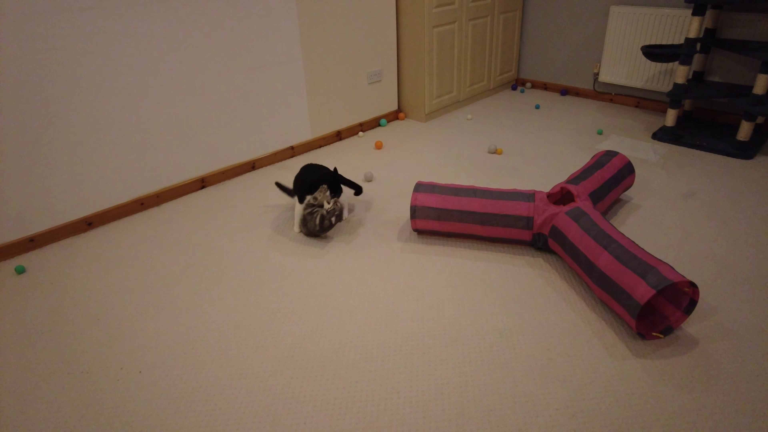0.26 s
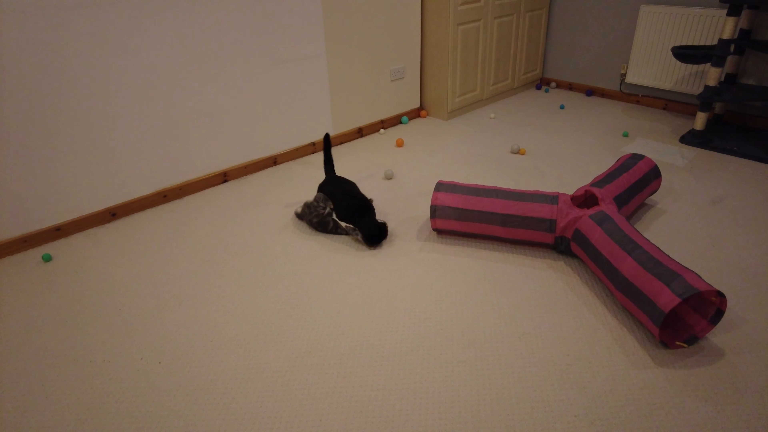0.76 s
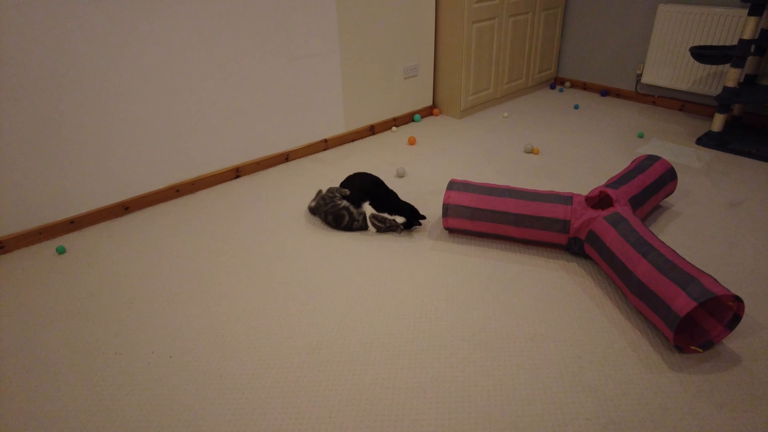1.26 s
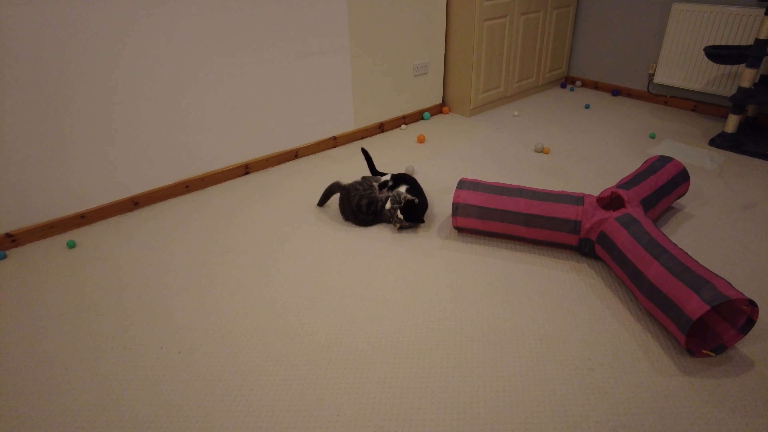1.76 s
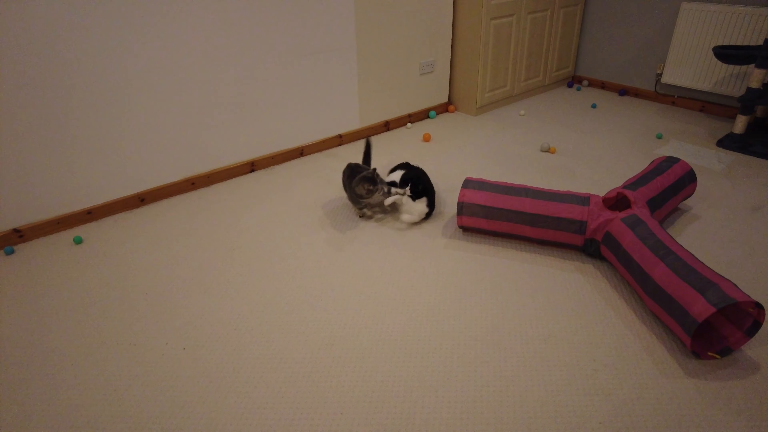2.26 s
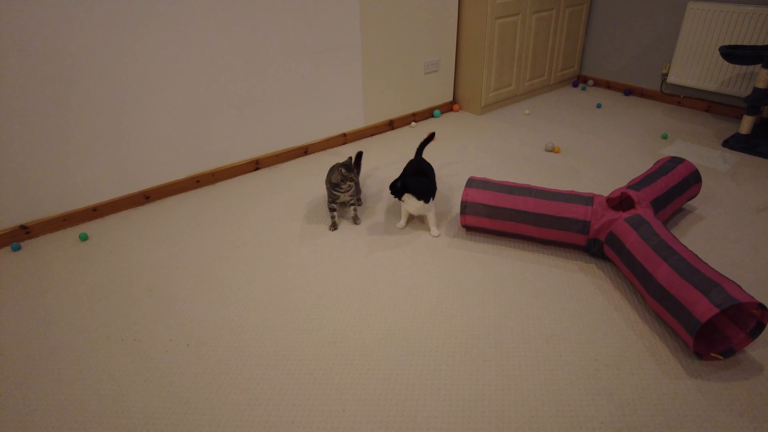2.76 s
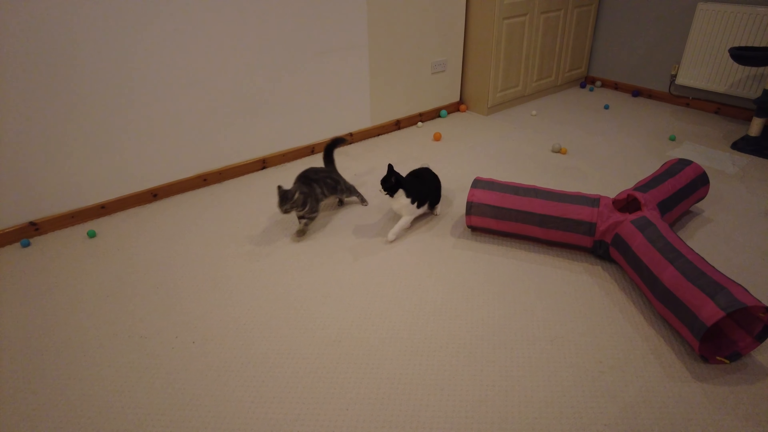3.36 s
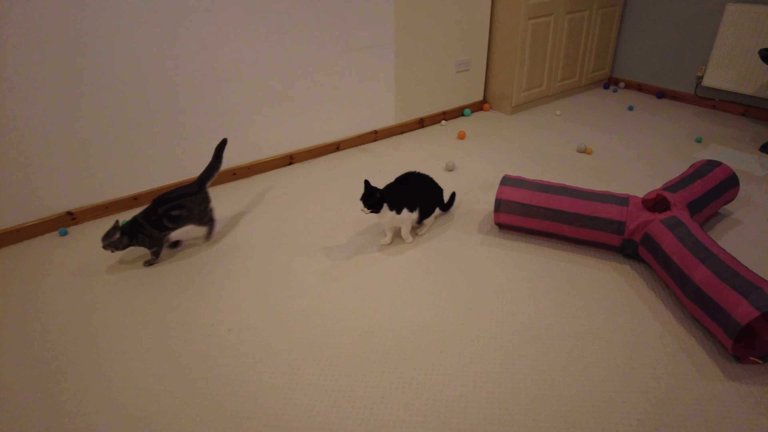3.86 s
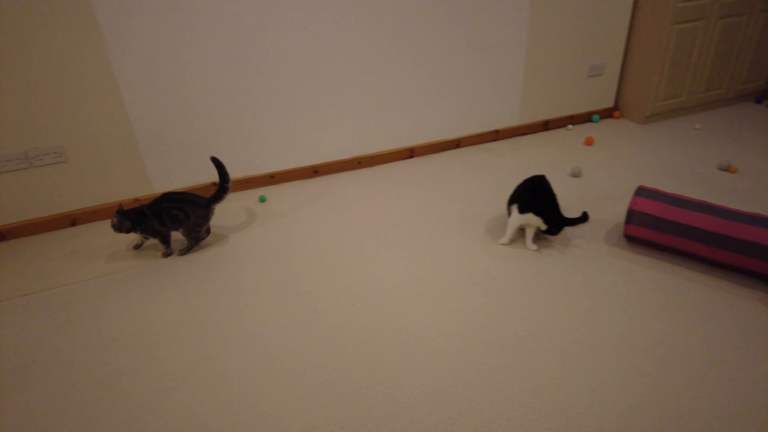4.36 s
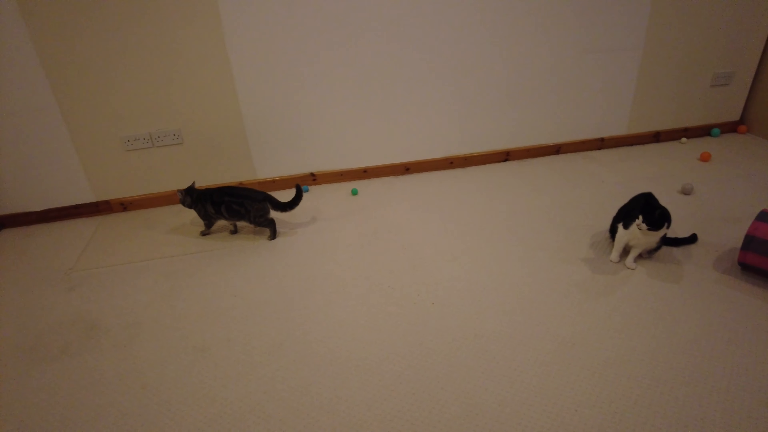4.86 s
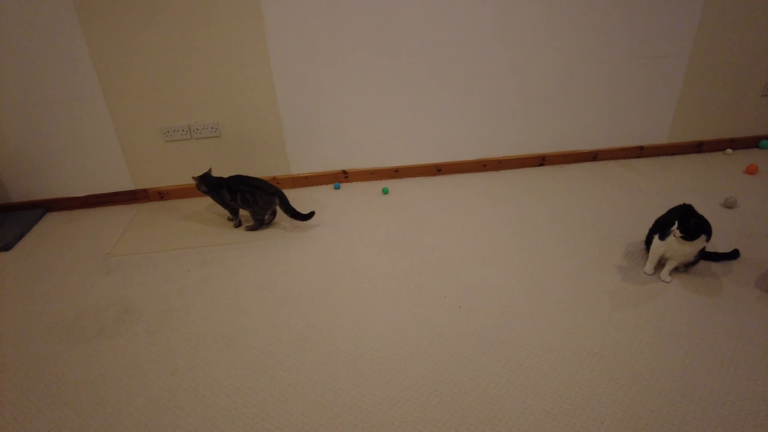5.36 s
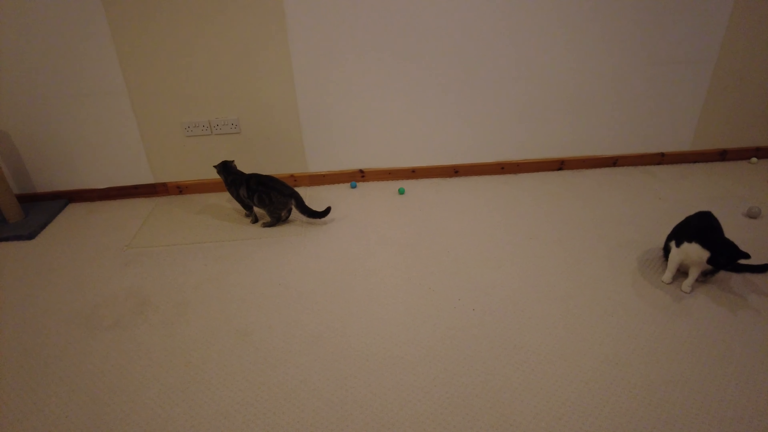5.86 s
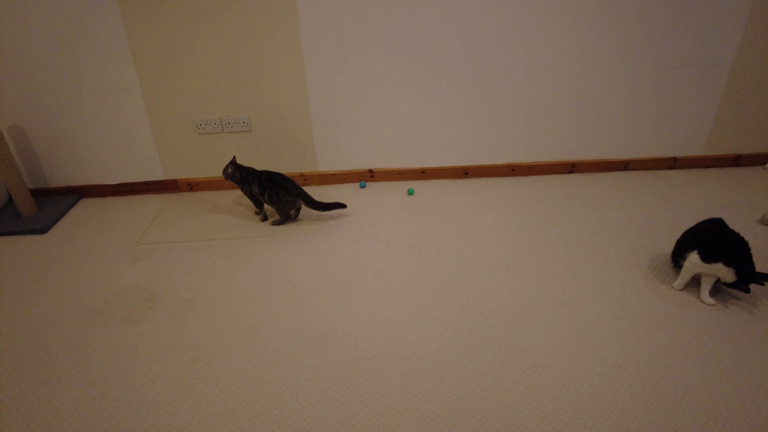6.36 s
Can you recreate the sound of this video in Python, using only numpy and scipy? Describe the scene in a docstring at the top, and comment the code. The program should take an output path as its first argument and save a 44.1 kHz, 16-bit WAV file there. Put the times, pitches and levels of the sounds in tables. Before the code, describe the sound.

Two cats wrestle on carpet laid over a springy wooden floor in a bare room. Rapid low padded thumps and brief scuffs come in clusters, with a crisp claw snap and knock midway and a heavy double landing as they part. Light paw steps follow, then a short airy spit and tiny high squeaks. The camera microphone, some distance away, adds soft hiss over low house rumble.

```python
"""A bare room with carpet on a sprung wooden floor: two cats wrestle, then part; one spits and squeaks.
Landings ring decaying low floor modes, paws are short padded tones, claws snap and knock the boards.
Shoves swell shaped noise for rolling, scrabbling and fur on the pile; the voice is puffs and wavering tones.
Noise tails answer as the room; filtered noise makes the floor sway, the house rumble, the faint whine
and the camera's hiss."""
import sys
import numpy as np
from scipy import signal
from scipy.fft import rfft, irfft, next_fast_len
from scipy.io import wavfile
from scipy.ndimage import uniform_filter1d, map_coordinates

SR = 44100
rng = np.random.default_rng(int(sys.argv[2]) if len(sys.argv) > 2 else 0)


def transcribe(signal):
    """Save signal, clipped to [-1, 1], as a 16-bit WAV file at the path in sys.argv[1]."""
    frames = np.atleast_2d(signal).T
    limited = np.clip(frames, -1, 1)
    pcm = np.round(limited * 32767).astype(np.int16)
    wavfile.write(sys.argv[1], SR, pcm)


N = 291324

# Heavy landings that shake the floor: (time [s], boom level [dB], joist sway level [dB])
LANDINGS = [(0.063, -27, -29), (0.179, -12.5, -50), (0.231, -19.5, -50), (0.279, -13.5, -32),
            (0.328, -19, -41), (0.421, -21.5, -46), (0.579, -11, -11.5), (0.652, -15.5, -49),
            (0.688, -14.5, -37), (0.767, -14, -33), (0.817, -12.5, -48), (0.928, -58, -23),
            (1.144, -27, -25), (1.597, -21.5, -45), (1.818, -31, -21), (2.048, -31, -50), (2.253, -26, -59),
            (2.426, -5.5, -36), (2.5, -11, -49), (2.548, -17, -17.5), (2.849, -22.5, -62),
            (3.054, -51, -18), (3.72, -36, -55), (4.067, -23, -53), (4.167, -59, -25)]
# Floor and room modes, the joists first: (frequency [Hz], relative level [dB], decay t60 [s])
FLOOR_MODES = [(21.37, -3, 0.53), (53.8, 1.5, 0.16), (74.2, -2, 0.11), (103.2, -17.5, 0.18)]

# Paws and flanks on the carpet, toes the highest: (time [s], level [dB], pad pitch [Hz])
THUDS = [(0.033, -34, 234), (0.161, -20, 205), (0.164, -39.5, 750), (0.18, -14, 188), (0.263, -28, 462),
         (0.268, -18, 282), (0.292, -15.5, 221), (0.326, -22.5, 177), (0.367, -35, 580),
         (0.383, -23.5, 200), (0.501, -36, 500), (0.505, -19, 291), (0.527, -20.5, 205),
         (0.556, -22.5, 184), (0.677, -36.5, 574), (0.694, -27, 163), (0.754, -20, 289), (0.7, -34, 614),
         (0.785, -24, 316), (0.795, -28, 645), (0.81, -26.5, 648), (0.81, -21.5, 189), (0.849, -33, 510),
         (0.967, -43, 750), (1.037, -43.5, 764), (1.094, -35, 337), (1.233, -37, 550), (1.285, -44, 1240),
         (1.442, -37, 715), (1.53, -33.5, 790), (1.564, -24.5, 210), (1.567, -17.5, 587), (1.57, -27, 1310),
         (1.572, -31, 1720), (1.605, -27, 736), (1.622, -33, 1270), (1.574, -20, 800), (1.587, -19, 215),
         (1.609, -31, 190), (1.592, -18.5, 740), (1.63, -22.5, 304), (1.63, -28, 650), (1.776, -18.5, 241),
         (1.782, -31, 683), (1.785, -35, 445), (1.808, -26, 155), (1.81, -34, 676), (1.83, -18.5, 173),
         (2.019, -25, 219), (2.049, -30, 230), (2.083, -37.5, 720), (2.345, -33, 584), (2.354, -25, 200),
         (2.397, -24.5, 537), (2.41, -32.5, 695), (2.422, -26, 540), (2.44, -28, 536), (2.436, -13, 225),
         (2.456, -32, 854), (2.485, -40, 790), (2.456, -19, 483), (2.46, -8.5, 304.5), (2.479, -22, 472),
         (2.484, -16, 300), (2.47, -32, 866), (2.486, -19, 390), (2.5, -22, 160), (2.518, -25, 220),
         (2.548, -20.5, 167), (3.348, -35, 164), (3.503, -29.5, 154.4), (3.628, -45.5, 624),
         (3.634, -35.5, 254), (3.78, -49.5, 846), (3.789, -29.5, 156), (3.889, -32.5, 303),
         (3.866, -34, 247), (3.866, -42.5, 580), (4.028, -32, 252), (4.085, -31, 488), (4.096, -35, 151),
         (4.148, -27.5, 146), (4.384, -44, 744), (4.469, -37.5, 210), (4.472, -48.5, 677)]
PAD_DECAY_S = 0.83 / 205  # the same for every pad, so higher pads ring more cycles
PAD_PAN_DB, CLAW_PAN_DB = 2.5, 2  # the cats are left of the camera
# Standing waves of the room: (frequency [Hz], width [Hz], level [dB])
STANDING_WAVES = [(155, 4.5, 3.5), (195.4, 6.7, 2.5), (265.6, 6.4, -10.5)]

# Claws catching the pile, with two early wall echoes of the strongest crack at 1.5742 and 1.5906 s:
# (time [s], crack peak [dB], knock peak [dB], treble tilt [dB at 4 kHz])
CLAWS = [(0.264, -51, -38, -10), (0.3673, -60, -30, 0), (0.7937, -33, -38, 2), (1.1006, -44, -52, -4),
         (1.2307, -39, -30, 5), (1.2393, -65, -34, 11), (1.4419, -33, -39, -6), (1.5073, -38, -36, 7),
         (1.568, -24, -10.5, 5), (1.5742, -40, -19, 7), (1.5756, -32, -31, -16), (1.5906, -41, -26, 9),
         (2.461, -38, -46, -12), (4.0315, -53, -41, -3), (4.0456, -48, -41, -12), (4.0986, -60, -36.5, -10)]
# Spectrum of a claw's crack: (frequency [Hz], level [dB])
SNAP_SPECTRUM = [(1200, -31), (2500, 14), (4000, 1), (5500, 3), (7200, -7.5), (9500, -6), (12500, -11),
                 (16000, -47)]
FRAY = 0.13  # strength of fibres tearing after the snap, against a snap of 1
# Boards under the carpet: (frequency [Hz], width [Hz], level [dB])
BOARDS = [(463, 860, -1.5), (1280, 2900, -8.5)]

# Shoves and slides over the carpet, levels at their strongest moment:
# (time [s], swell time [s], body weight [dB], pile dragged [dB], fur rubbed [dB])
SHOVES = [(0.06, 0.21, -49, -58, -57), (0.165, 0.012, -43.5, -60, -64), (0.277, 0.044, -32, -57, -63),
          (0.325, 0.15, -42, -70, -53.5), (0.37, 0.012, -46, -51, -69), (0.516, 0.03, -36, -70, -65),
          (0.56, 0.064, -70, -55.5, -59), (0.691, 0.058, -42, -58, -56.5), (0.8, 0.019, -38, -44.5, -44),
          (0.84, .03, -59, -54.5, -71), (1.1, 0.18, -61, -63, -64), (1.24, 0.03, -48, -47, -59),
          (1.45, 0.035, -52.5, -57, -52.5), (1.53, 0.12, -51, -52, -60), (1.6, 0.12, -34, -44.5, -52.5),
          (1.788, 0.11, -35.5, -50.5, -57.5), (1.89, 0.063, -44, -62, -57.5),
          (2.031, 0.067, -48.5, -58, -56.5), (2.112, 0.12, -48, -52.5, -55),
          (2.26, 0.13, -47.5, -65, -53.5), (2.349, 0.055, -46.5, -46.5, -56), (2.41, 0.058, -39, -62, -60),
          (2.472, 0.073, -27.5, -48.5, -49.5), (3.52, 0.07, -49, -69, -59), (3.6, 0.099, -54, -78, -65),
          (3.77, 0.46, -51.5, -72, -65), (3.892, 0.15, -49.5, -71, -61), (4.039, 0.02, -39, -68, -58),
          (4.108, 0.047, -37, -53.5, -57.5), (4.36, 0.081, -60, -55, -59.5), (4.47, 0.044, -50.5, -68, -60),
          (4.55, 0.12, -58.5, -88, -80), (6.58, 0.05, -76, -61, -73)]
SWELL_DB = 18  # rise over the swell time
# Fade after each shove: one rate each for rolling, scrabbling, pile, fur [dB/s]
FALL_RATES = [142, 124, 131, 107]
SCRABBLE_SHARE, SCRABBLE_DB = 0.54, 1  # weight's share against drag in the scrabbling level, and its lift
# Bodies rolling on the carpet, spectrum: (frequency [Hz], level [dB])
ROLL_SPECTRUM = [(90, -52), (155, 16.5), (200, 11), (290, 7), (420, 7), (700, -44)]
# Paws scrabbling, spectrum: (frequency [Hz], level [dB])
SCRABBLE_SPECTRUM = [(300, -9), (480, 15), (600, 11.5), (800, 7.5), (1000, -1), (1500, -48)]
# Carpet pile dragged, spectrum: (frequency [Hz], level [dB])
PILE_SPECTRUM = [(700, -10), (1200, 6.5), (1800, -1.5), (2500, -12), (4000, -19), (7000, -41)]
# Fur scrubbing the carpet, spectrum: (frequency [Hz], level [dB])
FUR_SPECTRUM = [(1800, 7.5), (3000, 3.5), (5000, -2.5), (8000, -9), (12000, -13.5), (13500, -23),
                (15000, -31), (15700, -49)]
# Extra brightness of hard-rubbed fur, spectrum: (frequency [Hz], level [dB])
SHEEN_SPECTRUM = [(9000, -40), (11000, -11), (15000, -3), (15700, -2)]
SHEEN_DB, SHEEN_POWER = 31, 1.92  # gain, and how much faster than the fur it grows

# The spit, a single row: (time [s], length [s], level [dB])
SPIT = (4.108, 0.023, -38.5)
TRAIL_DB, TRAIL_T60 = -9.5, 0.5  # air still leaking after the spit: level against the spit, decay [s]
# The open mouth of the spit: (frequency [Hz], width [Hz], level [dB])
OPEN_MOUTH = [(2400, 330, -3), (3080, 470, 0), (3900, 440, -3.5), (4770, 350, 5), (6000, 960, -10)]
# The mouth as it relaxes: (frequency [Hz], width [Hz], level [dB])
RELAXED_MOUTH = [(2570, 490, -5), (3520, 810, 1), (4700, 700, 1), (5900, 870, -9)]
# A faint hoarse tone, a single row:
# (time [s], length [s], start [Hz], end [Hz], level [dB], octave above against it [dB])
MEW = (3.565, .12, 1450, 1360, -59, -5)
# Squeaks, the first a mere tick: (time [s], length [s], pitch [Hz], level [dB])
SQUEAKS = [(3.7075, 0.0027, 2100, -48), (4.337, 0.026, 1905, -46), (4.362, 0.012, 2050, -57),
           (4.383, 0.017, 1840, -52)]
HOARSE_HZ, SQUEAK_WANDER_HZ = 170, 75  # depth of the random pitch wander of mew and squeaks

# Sway of the floor in its two lowest modes: (time [s], joist level [dB], boom level [dB])
SWAY = [(0.0, -36.5, -45.5), (0.5, -43, -40.5), (0.75, -23.5, -33.5), (1.18, -43, -46.5),
        (1.78, -35, -40.5), (2.04, -36.5, -46), (2.3, -33, -43), (2.5, -35.5, -24.5), (2.76, -36.5, -43.5),
        (3.13, -39, -45.5), (3.26, -42.5, -46.5), (3.72, -37.5, -40), (3.95, -43, -44.5),
        (4.27, -33.5, -46.5), (4.82, -46.5, -49), (5.32, -52.5, -43.5), (5.8, -47, -50), (6.61, -51, -49)]
# Faint wavering bands in the room tone, applied twice over: (frequency [Hz], width [Hz], level [dB])
WHINE_BANDS = [(1295, 70, -1), (1755, 160, 0), (2314, 43, 0), (2780, 290, -4)]
# Rumble and tone of the house, spectrum: (frequency [Hz], level [dB])
HOUSE_SPECTRUM = [(50, -53), (85, -5), (200, -6), (281, -11), (322, -7), (391, -17), (438, -14),
                  (1000, -30.5), (1300, -58), (2200, -120)]
# Hiss of the camera, spectrum: (frequency [Hz], level [dB])
HISS_SPECTRUM = [(300, -10), (1000, -2), (1750, -1.5), (2100, -2), (2800, -2.5), (5000, -5), (8000, -9.5),
                 (12500, -17), (13000, -33)]
WHINE_DB, HOUSE_DB, HISS_DB = -71.5, -55, -64.5
PATCHY_DB = 2.5  # depth of the swelling and fading of random bands

# How alike left and right noise are: (frequency [Hz], likeness [-1 to 1])
LIKENESS = [(30, 0.97), (60, 0.93), (130, 0.99), (290, 0.7), (640, -0.077), (1400, -0.022), (3100, 0.41),
            (6800, 0.46), (15000, 0.11)]
# Decay of the room: (frequency [Hz], t60 [s])
ROOM_DECAY = [(150, 0.55), (400, 0.47), (800, 0.29), (2000, 0.38), (5000, 0.21), (12000, 0.31)]
# The camera body colours sound from the room: (frequency [Hz], width [Hz], boost [dB])
CAMERA_BODY = [(1040, 280, -2), (2200, 690, -1.5), (2900, 650, 1.5), (3600, 550, -3), (4270, 520, 2),
               (6320, 600, 4), (6930, 900, -3.5), (9000, 810, .5)]
TOP_HZ = 15750  # band limit of the camera


def amp(db):
    """Decibels to amplitude."""
    return 10 ** (np.asarray(db) / 20)


def unit(x):
    """Scale to an rms of 1."""
    return x / np.sqrt(np.mean(x ** 2) + 1e-20)


def along(points, hz):
    """Read (frequency, value) points on a log frequency axis."""
    f, v = np.transpose(points)
    return np.interp(np.log(hz + 1), np.log(f + 1), v)


def curves(rows):
    """One gain per sample for each dB column after the time."""
    s, *columns = np.transpose(rows)
    return [amp(np.interp(np.arange(N) / SR, s, column)) for column in columns]


def filtered(x, response):
    """Shape x by a complex response of frequency."""
    m = next_fast_len(x.shape[-1] + 8192)
    return irfft(rfft(x, m) * response(np.fft.rfftfreq(m, 1 / SR)), m)[..., :x.shape[-1]]


def modes(table):
    """Causal response of (frequency, width, level) resonances, summed with alternating sign."""
    def response(f):
        total = 0
        for k, (centre, width, db) in enumerate(table):
            damping = 1j * f * width
            total = total + (-1) ** k * amp(db) * damping / (centre * centre - f * f + damping)
        return total
    return response


def pair(n):
    """Two white noises, as alike as a diffuse field is at the two ports."""
    def mid_side_gains(hz):
        turn = np.arccos(np.clip(along(LIKENESS, hz), -1, 1)) / 2
        return np.array([np.cos(turn), np.sin(turn)])
    mid, side = filtered(rng.standard_normal((2, n)), mid_side_gains)
    return np.array([mid + side, mid - side])


def wander(t, rate):
    """Smooth random drift with rate new values a second."""
    return map_coordinates(rng.standard_normal(int(t[-1] * rate) + 4), [t * rate])


def rush(spectrum, lumpy_db, rate):
    """Stereo noise of rms 1 in lumps, rate a second."""
    lumps = wander(np.arange(N) / SR, rate)
    noise = filtered(pair(N), lambda hz: amp(along(spectrum, hz)))
    return unit(amp(lumpy_db * lumps) * noise)


def patchy(x):
    """Random bands of a noise swell and fade; the result has rms 1."""
    z = signal.stft(x, nperseg=512)[2]
    field = uniform_filter1d(rng.standard_normal(z.shape[1:]), size=7, axis=0)  # smooth over frequency
    field = uniform_filter1d(field, size=8, axis=1)  # and over time
    return unit(signal.istft(z * amp(PATCHY_DB * unit(field)), nperseg=512)[1][:, :N])


def add(out, s, sound, pan_db, wet_db, count=0, dull_db=0):
    """Place a sound and its own room tail, each frequency dying at its own speed.

    The right port hears the direct sound count samples later.
    Carpet and curtains take treble off the tail, dull_db at 4 kHz and more above."""
    hz, t, z = signal.stft(pair(SR // 4), SR, nperseg=256)
    decay_db = -60 * t / along(ROOM_DECAY, hz)[:, None]
    treble_db = dull_db * np.log2(hz / 4000 + 1)[:, None]
    tail = signal.istft(z * amp(decay_db - treble_db), SR, nperseg=256)[1]
    delayed = np.pad(sound, (140, 0))[None]  # the room answers a little late
    wet = signal.fftconvolve(delayed, tail / np.linalg.norm(tail[0]), axes=1)
    at = round(s * SR)
    out[0, at:at + len(sound)] += sound * amp(pan_db / 2)
    out[1, at + count:at + count + len(sound)] += sound * amp(-pan_db / 2)
    out[:, at:at + wet.shape[1]] += amp(wet_db) * wet * amp([[pan_db / 4], [-pan_db / 4]])


def landings():
    """A soft blow rings the low floor modes, slightly stronger at the right port."""
    out, t = np.zeros(N + SR), np.arange(SR) / SR
    soft_onset = 1 - np.exp(-t / 0.016)
    for s, boom_db, sway_db in LANDINGS:
        for k, (hz, db, t60) in enumerate(FLOOR_MODES):
            blow_db = boom_db if k else sway_db  # the first mode is the joists
            level = amp(blow_db + db - 60 * t / t60)
            out[round(s * SR):][:SR] += level * np.sin(2 * np.pi * hz * t) * soft_onset
    return out[:N] * amp([[-.7], [.7]])


def thuds():
    """A padded contact gives a brief tone at its own pitch; the rest is the room and its standing waves."""
    out, t = np.zeros((2, N + SR)), np.arange(SR // 10) / SR
    u = t / PAD_DECAY_S
    for s, db, hz in THUDS:
        pad = amp(db) * u * np.exp(-u) * np.sin(2 * np.pi * hz * t)
        add(out, s, pad, PAD_PAN_DB, wet_db=-2.5)
    return out[:, :N] + filtered(out[:, :N].mean(axis=0), modes(STANDING_WAVES))


def claws():
    """A thread lets go with a crack and the paw knocks the boards; two rows are early wall echoes."""
    out, t = np.zeros((2, N + SR)), np.arange(SR // 20) / SR
    snap = np.arange(len(t)) == round(SR / 5000)  # a single click
    knock = filtered(t * np.exp(-t / .0001), modes(BOARDS))  # the pad softens the blow
    knock = knock / abs(knock).max()
    for s, db, knock_db, tilt_db in CLAWS:
        burst = FRAY * amp(-60 * t / 0.006) * rng.standard_normal(len(t)) - snap
        crack = filtered(burst, lambda hz: amp(along(SNAP_SPECTRUM, hz) + tilt_db * np.log2(hz / 4000 + 1)))
        snag = amp(db) * crack / abs(crack).max() - amp(knock_db) * knock
        add(out, s, snag, CLAW_PAN_DB, wet_db=-1.5, dull_db=3.0)
    return out[:, :N]


def scuffle():
    """Each shove swells and fades; rolling, scrabbling, pile and fur are noise, mostly lumpier when lower."""
    power, t = np.zeros((4, 6700)), np.arange(6700) / 1000  # envelopes in 1 ms steps
    fall = -np.array(FALL_RATES)[:, None]
    for s, swell, weight_db, drag_db, fur_db in SHOVES:
        paws_db = SCRABBLE_SHARE * weight_db + (1 - SCRABBLE_SHARE) * drag_db + SCRABBLE_DB
        peak_db = np.array([[weight_db], [paws_db], [drag_db], [fur_db]])
        slope = np.where(t < s, SWELL_DB / swell, fall)
        power += amp(peak_db + slope * (t - s)) ** 2
    roll, scrabble, pile, fur = (np.interp(np.arange(N) / SR, t, g) for g in np.sqrt(power))
    out = roll * rush(ROLL_SPECTRUM, lumpy_db=2.5, rate=37)
    out += scrabble * rush(SCRABBLE_SPECTRUM, lumpy_db=3.0, rate=27)
    out += pile * patchy(rush(PILE_SPECTRUM, lumpy_db=1.0, rate=120))
    # hard rubbing brightens the fur
    out += amp(SHEEN_DB) * fur ** SHEEN_POWER * rush(SHEEN_SPECTRUM, lumpy_db=0.0, rate=200)
    return out + fur * patchy(rush(FUR_SPECTRUM, lumpy_db=1.0, rate=330))


def spit(out):
    """A sputtering puff of noise through the open mouth, then air leaking as the mouth relaxes."""
    s, length, db = SPIT
    t = np.arange(round(length * SR)) / SR
    sputter = 1 + 0.31 * np.sin(2 * np.pi * 230 * t)
    puff = np.sin(np.pi * t / length) ** 0.32 * sputter * rng.standard_normal(len(t))
    shaped = filtered(puff, lambda hz: modes(OPEN_MOUTH)(hz) * (hz > 2100) * (hz < 7200))
    add(out, s, amp(db) * unit(shaped), 3.0, wet_db=-2.5, count=2)

    t = np.arange(SR // 4) / SR
    breath = rng.standard_normal(len(t))
    trail = unit(filtered(breath, lambda hz: modes(RELAXED_MOUTH)(hz) * (hz > 2200) * (hz < 6600)))
    leak = amp(db + TRAIL_DB - 60 * t / TRAIL_T60) * (1 - np.exp(-t / 0.0045))
    add(out, s + length / 2, leak * trail, 3.0, wet_db=-0.5, count=2)


def mew(out):
    """A faint gliding tone and its octave, hoarse from fast pitch wander."""
    s, length, start_hz, end_hz, db, octave_db = MEW
    t = np.arange(round(length * SR)) / SR
    pitch = start_hz + (end_hz - start_hz) * t / length + HOARSE_HZ * wander(t, 500)
    phase = 2 * np.pi * np.cumsum(pitch) / SR
    tone = np.sin(phase) + amp(octave_db) * np.sin(2 * phase)
    add(out, s, amp(db) * np.sin(np.pi * t / length) * tone, 1.5, wet_db=-7)


def squeaks(out):
    """Brief wavering sine tones that rise faster than they fade."""
    for s, length, hz, db in SQUEAKS:
        t = np.arange(round(length * SR)) / SR
        phase = 2 * np.pi * np.cumsum(hz + SQUEAK_WANDER_HZ * wander(t, 300)) / SR
        swell = np.sin(np.pi * np.sqrt(t / length))
        add(out, s, amp(db) * swell * np.sin(phase), 1.5, wet_db=-6.0, count=2)


def voice():
    """Spit, mew and squeaks, each with its room tail."""
    out = np.zeros((2, N + SR))
    spit(out)
    mew(out)
    squeaks(out)
    return out[:, :N]


def house():
    """The swaying floor keeps the two lowest modes moving over the room tone, a faint whine and the hiss."""
    joist, boom = curves(SWAY)
    shaking = pair(N) * amp([[-.7], [.7]])
    out = joist * unit(filtered(shaking, lambda hz: modes([(22, 12, 0)])(hz) ** 2))
    out += boom * unit(filtered(shaking, lambda hz: modes([(55, 16, 0)])(hz) ** 2))
    out += amp(WHINE_DB) * patchy(filtered(pair(N), lambda hz: modes(WHINE_BANDS)(hz) ** 2))
    out += amp(HOUSE_DB) * rush(HOUSE_SPECTRUM, lumpy_db=-0.56, rate=2.27)
    return out + amp(HISS_DB) * rush(HISS_SPECTRUM, lumpy_db=.2, rate=8)


def camera_body(f):
    """Causal boosts and dips of the camera body."""
    gain = 1
    for centre, width, db in CAMERA_BODY:
        spring, damping = centre * centre - f * f, 1j * f * width
        gain = gain * (spring + damping * amp(db / 2)) / (spring + damping * amp(-db / 2))
    return gain


def scene():
    """The cats coloured by the camera body, over the uncoloured floor modes and house."""
    cats = thuds() + claws() + scuffle() + voice()
    return landings() + filtered(cats, camera_body) + house()


def record(dry):
    """The camera keeps nothing above its band limit."""
    return filtered(dry, lambda hz: hz < TOP_HZ)


dry = scene()
out = record(dry)
transcribe(out)
```